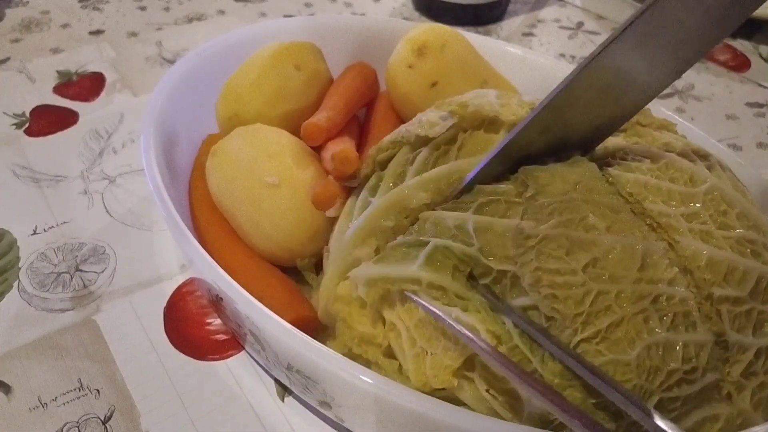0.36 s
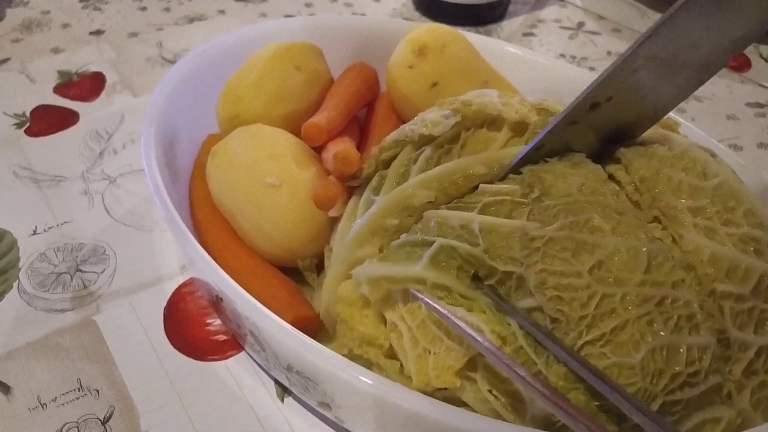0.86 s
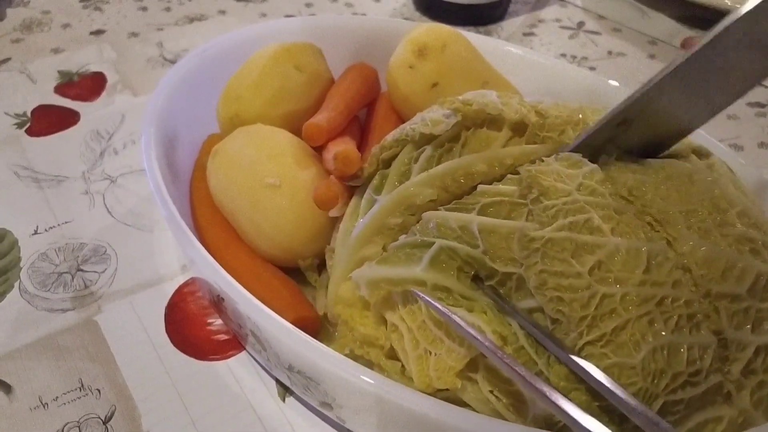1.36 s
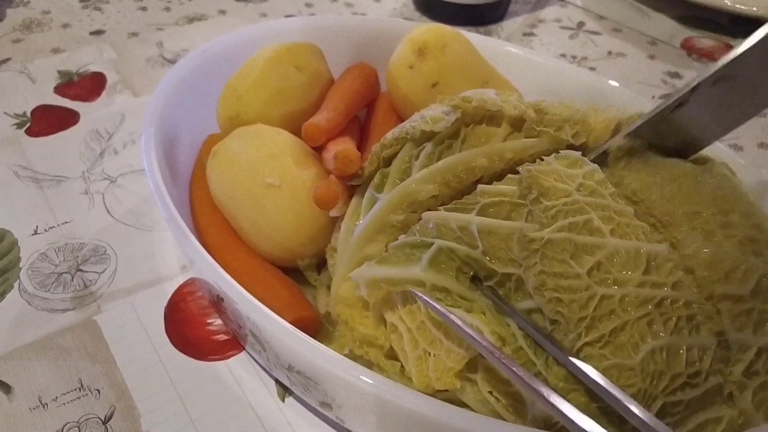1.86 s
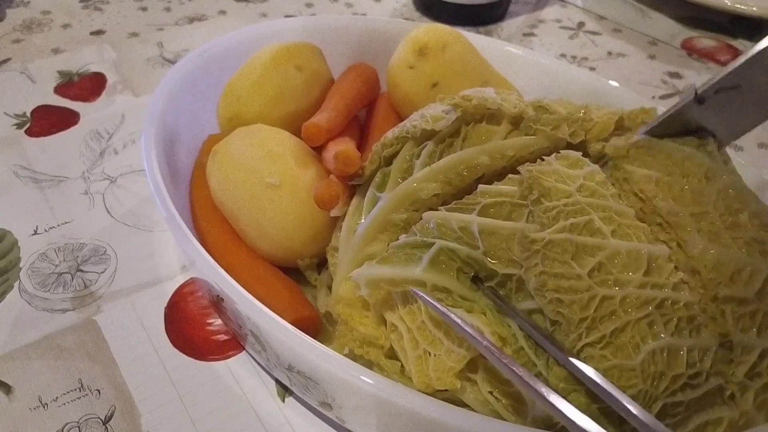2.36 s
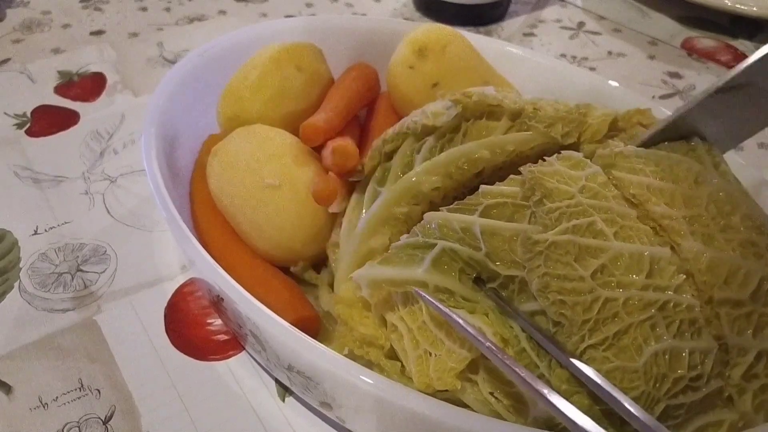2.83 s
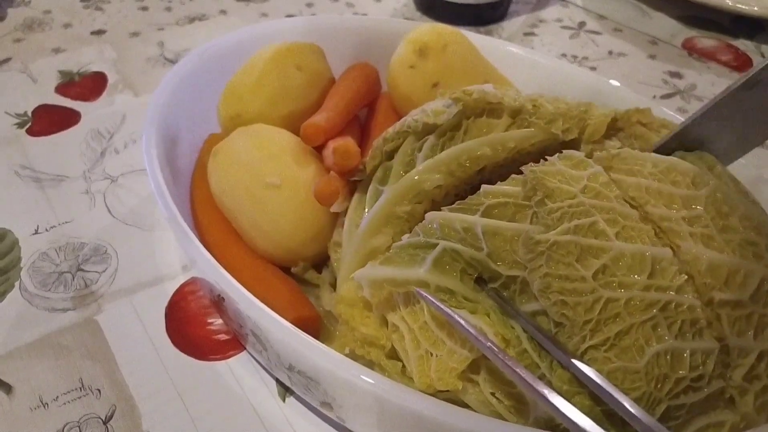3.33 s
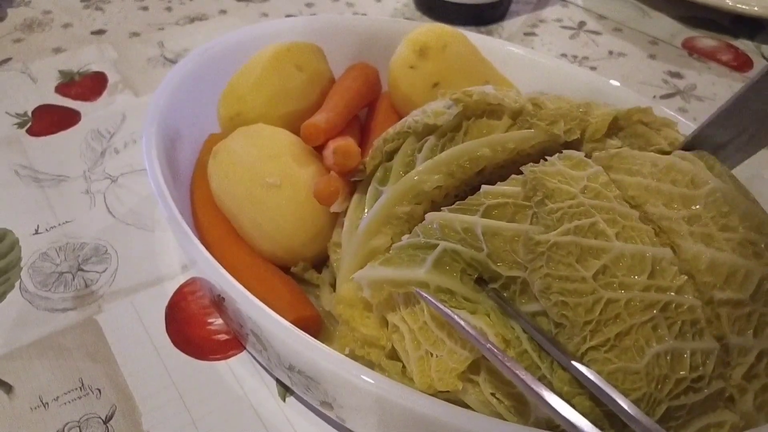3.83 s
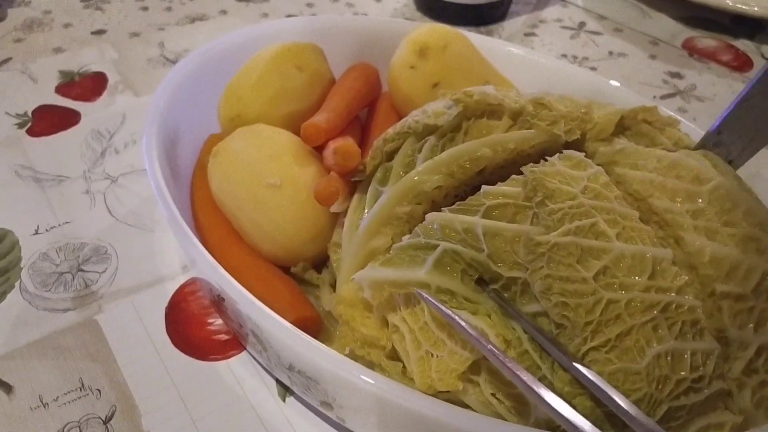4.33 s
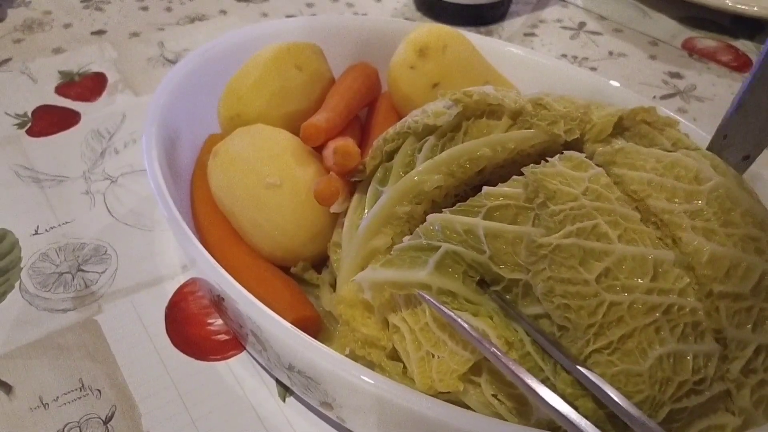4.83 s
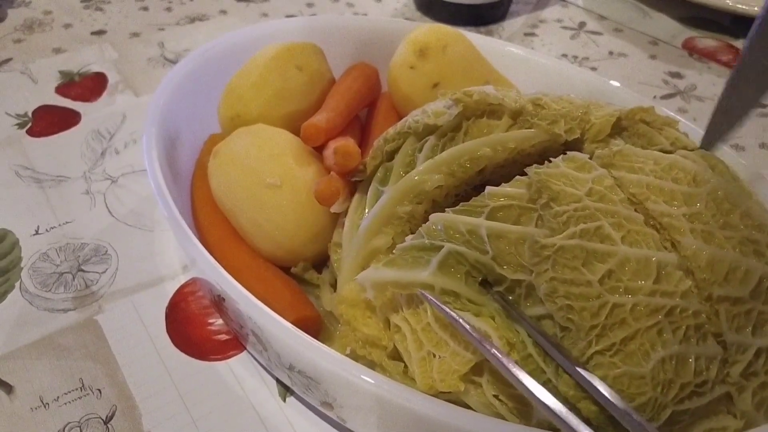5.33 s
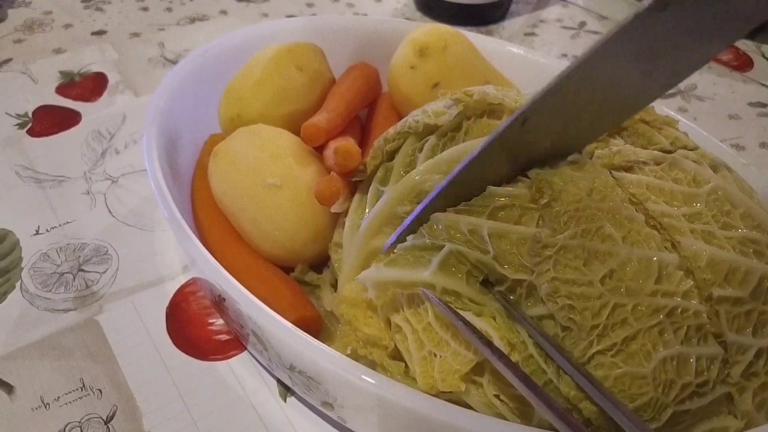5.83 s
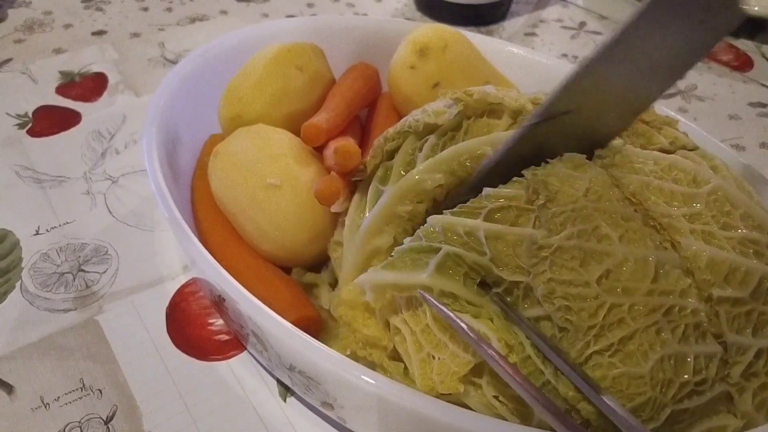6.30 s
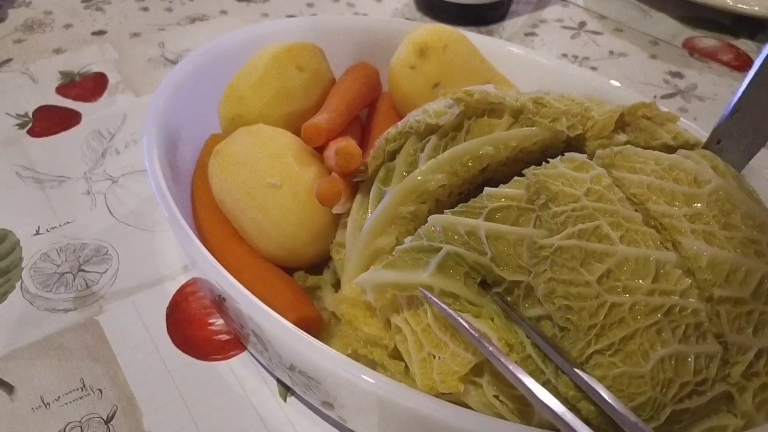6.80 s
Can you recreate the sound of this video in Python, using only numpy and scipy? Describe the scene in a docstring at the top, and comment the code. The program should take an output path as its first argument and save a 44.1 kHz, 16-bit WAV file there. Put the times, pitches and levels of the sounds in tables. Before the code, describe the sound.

In a small hard kitchen, a steel knife works through soft cooked cabbage in a ceramic dish. Quiet wet squelches and hisses alternate with thuds on the dish floor, which grow into loud hard knocks. Bright clinks on the rim follow, then a near-quiet pause, a quick triple tap, and a short gritty scrape with a slight squeal ending in a sharp clink. Close phone microphone, short live echo.

```python
"""In a small hard kitchen, a steel knife saws through cooked cabbage in a ceramic dish, close to a phone.
Coloured noise that swells with each stroke makes the wet leaves squelch and hiss; short sines make them snap.
The blade chops the dish floor and clinks on the rim: dying sines ring dish, blade and table, noise cracks.
Dragged along the glaze, it shakes the same sines with rough noise and squeals.
Fading noise makes the room's answer, over a low hum of filtered noise."""
import sys
import numpy as np
from scipy import signal
from scipy.fft import rfft, irfft, next_fast_len
from scipy.io import wavfile
from scipy.ndimage import map_coordinates

SR = 44100
rng = np.random.default_rng(int(sys.argv[2]) if len(sys.argv) > 2 else 0)


def digitize_waveform(pressure):
    """Quantize a signal to 16-bit integers and store it at the path in sys.argv[1].

    Rows of a 2-D input are taken as channels; values are limited to [-1, 1].
    """
    field = np.atleast_2d(pressure).T
    bounded = np.clip(field, -1, 1)
    quanta = np.round(bounded * 32767).astype(np.int16)
    wavfile.write(sys.argv[1], SR, quanta)


def how_loud(loudness_db):
    """Turn decibels into a plain amplitude multiplier (0 dB gives 1, 20 dB gives 10)."""
    steps = np.asarray(loudness_db, float) / 20
    return 10 ** steps


N = 305565  # length of the scene in samples
TAIL = SR // 2  # length of every ring and room tail in samples

# Steady kitchen air. Each row: frequency in Hz, level in dB.
HUM_COLOUR = [(12, -30), (20, 5), (32, -9), (105, -20.5), (151, -12.5), (217, -16.5), (249, -8),
              (270, -15.5), (818, -30.5), (914, -29.5), (1550, -40), (4310, -42.5), (9630, -39),
              (15000, -43.5)]
# How alike the hum is on left and right. Each row: frequency in Hz, likeness from 0 to 1.
HUM_LIKENESS = [(60, 0), (180, 0.68), (550, 0), (1650, 0.31), (4970, -0.0), (15000, 0.089)]
HUM_DB = -64

# Blade strokes through the leaves. Each row: start in seconds, length in seconds, squelch level in dB,
# hiss level in dB, swell of the squelch over the stroke in dB.
STROKES = [(0.01, 0.039, -84, -74, 3), (0.173, 0.14, -79.5, -79, 7), (0.405, 0.046, -85, -72.5, 5),
           (0.616, 0.097, -68, -70.5, 3), (0.977, .07, -76, -76, -2), (1.032, 0.095, -70.5, -64, 6.5),
           (1.44, 0.13, -71.5, -65.5, 11.5), (1.543, 0.026, -58.5, -75, 0.5), (1.723, 0.18, -80, -78, -14),
           (1.974, 0.15, -59.5, -67.5, -10.5), (2.267, 0.086, -75.5, -79.5, -2.5),
           (2.499, 0.16, -73.5, -75.5, 8), (2.922, 0.03, -78, -82, -6.5), (3.052, 0.1, -76, -69, 16.5),
           (3.383, .12, -72.5, -71, -17), (3.569, 0.054, -79.5, -72, 19), (3.92, 0.022, -75, -72, -12),
           (4.046, 0.07, -79, -68, 5), (4.3, 0.045, -64.5, -67.5, -5.5)]
# Colour of the squelch. Each row: frequency in Hz, level in dB.
SQUELCH_COLOUR = [(150, -13), (400, -3.5), (800, -4), (1200, -13), (2500, -14), (5000, -37.5),
                  (9000, -59.5)]
# Colour of the hiss. Each row: frequency in Hz, level in dB.
HISS_COLOUR = [(1500, -16), (3000, -6.5), (6000, -9.5), (9500, 1), (11000, -3), (12500, -25),
               (16000, -27.5)]
# Wet leaf snaps. Each row: start in seconds, level in dB, pitch in Hz.
SNAPS = [(1.4561, -54.5, 9500), (1.9914, -59, 10300), (3.057, -61, 10440), (3.099, -48.5, 8520),
         (3.1396, -52, 8700), (3.4164, -60, 10300), (3.43, -54, 10300), (3.9402, -54.5, 10550),
         (4.068, -49, 9000), (5.2874, -47.5, 8830)]
BITE_S, LETTING_GO_S = 0.03, 0.22  # rise at the start, time to fall 60 dB after the stroke
HISS_FADES_DB_PER_S = 26  # strongest as the edge bites
RESTING_SQUELCH_DB, RESTING_HISS_DB = -86, -100  # the cut leaves settle throughout

# Blade landing on the dish floor through the leaves. Each row: start in seconds, level in dB,
# spot (0 near end, 1 middle, 2 and above far end), weight in dB, sharpness of the edge in dB.
CHOPS = [(0.696, -26, 0.053, -4, 0.5), (1.123, -15.5, 0.069, -13, -6.5), (1.599, -25.5, 0.068, -11, -4),
         (2.104, -60, 0.37, 6, -10), (2.628, -13.5, 0.47, -17.5, -12), (3.159, -8.5, 0.98, -15, -11.5),
         (3.357, -39, 0.62, -14.5, -9), (3.65, -4.5, 0.97, -20.5, -21.5), (4.143, -9, 1.34, -16.5, -18.5),
         (4.51, -2, 1.42, -15.5, -19), (4.804, -7, 1.96, -4.5, -9.5), (4.818, -14.5, 1.7, -2.5, -4.5),
         (5.015, -9.5, 3.7, -2.5, -14), (6.227, -18.5, 0.64, -6, -2), (6.24, -25, 0.49, 0.5, 2.5),
         (6.254, -31, 0.37, 1, 2.5), (6.645, -58, 0.11, 7, -22)]
# Bare blade touching the rim. Each row: start in seconds, level in dB, weight in dB, edge in dB.
CLINKS = [(4.113, -10.5, -15.5, -11), (4.777, -4.5, -14, -4), (4.883, -11, -19.5, -9),
          (4.891, -16.5, -15.5, -11), (5.27, -27.5, -19.5, -19), (5.303, -26.5, -25.5, -14.5),
          (5.313, -35.5, -9.5, -3.5), (6.898, -3.5, -16.5, -6.5), (6.904, -7.5, -20, -10)]
# Where table, low dish, middle of the dish, high dish and steel sound. One frequency in Hz for each.
PARTS_HZ = [200, 650, 1350, 2500, 6000]
# Ringing modes of table, dish and blade. Each row: pitch in Hz, base decay time in seconds (at least
# halved when it rings), strength in dB for a chop at the near end, in the middle, at the far end,
# for a clink, for the drag.
MODES = [(87, 0.15, 11, -1, 2, 0, -19), (128, 0.11, 4, 2.5, 6, 0, -15), (171, 0.23, 11, 3, 0.5, 4.5, -15),
         (195.8, 0.29, 5.5, -0.5, -1.5, -1.5, -35), (254, .15, 13.5, 11.5, 10.5, 7.5, -30),
         (285, 0.16, 1, 4, 0.5, -1, -11), (341, 0.17, 10, 2, -0.5, -4, -15),
         (513.2, 0.24, 6.5, -11, 0, 4, -31), (546.7, 0.11, 16, -8, 11, 3.5, -2),
         (587.7, 0.21, 1.5, 9.5, -1, -4.5, 0.5), (647, 0.22, -11, -9, 7, 9.5, -8),
         (741, 0.13, 1.5, 0.5, 11.5, -1, -25), (798, 0.098, 8.5, 5, 5.5, 3, -50),
         (840.5, 0.083, 9.5, 1, 9.5, 10.5, -42), (976, .14, 2, 8.5, -4, -14.5, -5),
         (1288, 0.092, -7.5, -13.5, -8.5, -6, 9), (1340, 0.05, -25, -3, -11, 11, -8),
         (1339.2, 0.32, 7.5, -9, 3.5, 0.5, 1), (1457, 0.11, -16, 11, -10, -6, -21),
         (1608, 0.17, -8.5, 3, -6.5, -10.5, -20), (1642, 0.28, -3, -5.5, -5.5, -2.5, -1),
         (1747, 0.17, -16.5, 9.5, -7.5, -11.5, -21), (2070, 0.11, 3.5, -1.5, -4, -11.5, -11),
         (2112, 0.24, -1.5, 10, 2.5, -0.5, -0.5), (2149, 0.096, 3, 2.5, -5.5, 13, -15),
         (2484, 0.062, 4, 5.5, -1.5, 2.5, -30), (2807, 0.25, -15, -9, 7, -6, -34),
         (2923, 0.27, 0, -4.5, 2, 5.5, -24), (3856, 0.19, 7.5, 6.5, -0.5, 3.5, -6),
         (3753, 0.075, 8.5, 5, 6.5, -7, -27), (4193, 0.18, 3, 8.5, 3, -5.5, -23),
         (4904, 0.22, -6.5, -4.5, -4, 8.5, -22), (5270, 0.066, 10.5, 14.5, 4.5, -1.5, -33),
         (6060, .35, -18.5, 3.5, -1, 8, -44), (7310, 0.26, -3.5, -5, -6.5, 12.5, -46),
         (8720, 0.083, 12.5, 15, 8, 16, -39), (9610, 0.088, 7.5, 5, 0, -2.5, -44),
         (10230, 0.23, 0, 5, 3.5, 7, -42), (9910, 0.06, 7, 12.5, 6, 1.5, -15),
         (12550, .25, -18.5, -5.5, -11, -5, -44), (13240, .2, -18.5, -10.5, -13, -8.5, -57)]
# Unpitched burst of a contact. Each row: frequency in Hz, level in dB.
CRACK_COLOUR = [(60, -11.5), (150, 3.5), (600, -5.5), (1500, -4), (2500, -14.5), (4000, -12), (6000, -8.5),
                (7500, -14), (9000, -11), (11000, -9), (12500, -30), (16000, -32.5)]
# Weight sounds in the table and the low dish, a sharp edge in the high dish and the steel.
CHOP_TABLE_DB, TABLE_DB_PER_SPOT, CHOP_STEEL_DB = 2.5, -1, -11
CLINK_TABLE_DB, CLINK_STEEL_DB = -7, -18.5

# Blade dragged on the glaze. Each row: time in seconds, pressure in dB, grit in dB.
DRAG = [(6.36, -32, -31), (6.4, -30, -21), (6.45, -35, -15.5), (6.5, -42, -13.5), (6.54, -33.5, -23),
        (6.62, -36.5, -25.5), (6.67, -37, -29), (6.715, -42.5, -27), (6.8, -39.5, -25.5),
        (6.87, -32.5, -30.5)]
# Colour of the grit. Each row: frequency in Hz, level in dB.
GRIT_COLOUR = [(300, -20), (700, 12), (1500, -7), (2500, 16), (3500, -1), (6000, -1.5), (9000, -5.5),
               (10800, 0), (12000, -47), (15000, -45.5)]
# The squeal swells and slides up where the stroke is fastest.
FASTEST_S, FAST_FOR_S = 6.61, 0.062  # centre and spread of a bell-shaped speed curve
SQUEAL_DB, SQUEAL_REST_DB, SQUEAL_HZ, SQUEAL_RISE_HZ = 5, -3, 1400, 227

# Room echo. Each row: frequency in Hz, time to fall 60 dB in seconds.
KITCHEN = [(80, 0.22), (250, 0.56), (600, 0.5), (1500, 0.4), (4000, 0.41), (10000, 0.35)]
# The right microphone port faces away. Each row: frequency in Hz, direct sound in dB under left,
# direct phase lag in radians, room in dB under left, likeness of the room to left from 0 to 1.
RIGHT_PORT = [(60, 5.5, -1.5, 2.5, 0.88), (124, 0.5, -0.74, 4.5, 0.6), (264, 7.5, -1.63, 5, 0.82),
              (559.6, 0, 0.5, 2, 0.43), (812, 4.5, 0.63, 7.5, 1), (1333, 1.5, 1.5, 2, 0.17),
              (1955, 5, 5, 5, 0.6), (2293, 13.5, 5, 11, 0.2), (3000, 9.5, 4.5, 9.5, 0.085),
              (4002, 11, 5, 13.5, .05), (5044, 2.5, 4.5, 9, 0.055), (6000, 8.5, 5, 10.5, 0.059),
              (7060, 14, 4, 16.5, .05), (8700, 21, -8, 19.5, .05), (10300, 30.5, 11, 23, 0.037),
              (14450, 16, 4.5, 9, .05)]


def unit(x):
    """Scales a sound to an rms of 1."""
    return x / np.sqrt(np.mean(x ** 2) + 1e-20)


def along(points, hz, column=1):
    """Reads one column of a table between its rows, on a log frequency axis."""
    table = np.transpose(points)
    return np.interp(np.log(hz + 1), np.log(table[0] + 1), table[column])


def curves(rows):
    """Draws straight lines between rows: one value per sample for each column after the time."""
    s, *cols = np.transpose(rows)
    return [np.interp(np.arange(N) / SR, s, c) for c in cols]


def wobble(rate):
    """Makes a smooth random curve with `rate` random points a second."""
    knots = rng.standard_normal(int(N * rate / SR) + 4)
    return map_coordinates(knots, [np.arange(N) * rate / SR])


def filtered(x, response):
    """Multiplies the spectrum of x by a response, which may also turn the phase."""
    m = next_fast_len(x.shape[-1] + 8192)
    spectrum = rfft(x, m) * response(np.fft.rfftfreq(m, 1 / SR))
    return irfft(spectrum, m)[..., :x.shape[-1]]


def noise(colour, size=N):
    """Makes random noise with a given colour and an rms of 1."""
    return unit(filtered(rng.standard_normal(size), lambda hz: how_loud(along(colour, hz))))


def heard(x, wet_db):
    """Stacks the direct sound and two unrelated room tails of it; in each tail every pitch dies at its own rate."""
    hz, t, z = signal.stft(rng.standard_normal((2, TAIL)), SR, nperseg=256)
    fading = z * how_loud(-60 * t / along(KITCHEN, hz)[:, None])
    tails = signal.istft(fading, SR, nperseg=256)[1][:, :TAIL]
    tails = tails * np.clip(np.arange(TAIL) / SR / 0.0021 - 0.4, 0, 1)  # the first walls come late
    tails = tails / np.linalg.norm(tails[0])
    wet = signal.fftconvolve(x[None], tails, axes=1)[:, :len(x)]
    return np.vstack([x, how_loud(wet_db) * wet])


def hum():
    """Steady kitchen air: slowly wavering noise, partly alike on the two ports through a shared and an opposed part."""
    def turn(hz):
        return np.arccos(np.clip(along(HUM_LIKENESS, hz), -1, 1)) / 2

    both = np.array([noise(HUM_COLOUR), noise(HUM_COLOUR)])
    mid, side = filtered(both, lambda hz: np.array([np.cos(turn(hz)), np.sin(turn(hz))]))
    level_db = HUM_DB + 2.9 * wobble(5.2) + [[1.5], [-1.5]]  # left a little louder
    return how_loud(level_db) * np.array([mid + side, mid - side])


def sawing():
    """Gains of squelch and hiss: each stroke bites, its squelch swells or sinks as its hiss fades, and it lets go."""
    t = np.arange(0, N / SR, 1 / 1000)  # one value each millisecond
    gains = how_loud([[RESTING_SQUELCH_DB], [RESTING_HISS_DB]]) * np.ones(len(t))
    for s, length, squelch_db, hiss_db, swell_db in STROKES:
        bite = np.clip((t - s) / BITE_S, 0, 1)
        letting_go = how_loud(-60 * np.maximum(t - s - length, 0) / LETTING_GO_S)
        squelch = how_loud(squelch_db + swell_db * np.clip((t - s) / length, 0, 1))
        hiss = how_loud(hiss_db - HISS_FADES_DB_PER_S * np.maximum(t - s, 0))
        gains = gains + bite * letting_go * [squelch, hiss]
    return curves(np.transpose([t, *gains]))


def leaves():
    """Wet leaves squelch and hiss along the blade, crackle finely and snap now and then."""
    squelch_gain, hiss_gain = sawing()
    crackle = 1 + 3.5 * np.maximum(wobble(700) - 1.3, 0)  # brief bursts as veins tear
    squelch = squelch_gain * how_loud(2.4 * wobble(33) + 3.2 * wobble(160)) * noise(SQUELCH_COLOUR)
    hiss = hiss_gain * how_loud(3.2 * wobble(30) + 1.1 * wobble(110)) * crackle * noise(HISS_COLOUR)
    snaps, t = np.zeros(N + TAIL), np.arange(400) / SR
    for s, db, hz in SNAPS:
        rough_phase = 2 * np.pi * hz * t + 0.37 * rng.standard_normal(len(t))
        snaps[round(s * SR):][:len(t)] += how_loud(db - 60 * t / 0.015) * np.sin(rough_phase)
    return heard(squelch + hiss + snaps[:N], wet_db=-4.5)


def ringing(damping):
    """One dying sine per mode; low modes swell for a cycle or two, leaves and fingers shorten the high ones most."""
    hz, decay_s = np.transpose(MODES)[:2, :, None]
    t = np.arange(TAIL) / SR
    dying = how_loud(-60 * t / decay_s * (2 + damping * hz / 1000))
    swelling = 1 - np.exp(-t * hz / 0.65)
    return dying * swelling * np.sin(2 * np.pi * hz * t)


def contacts(times, levels_db, parts_db, strengths_db, damping, ring_db, crack_db, crack_s, wet_db):
    """Each contact rings the modes at its own balance, each starting up or down at random, and cracks."""
    out, modes, t = np.zeros((3, N + TAIL)), ringing(damping), np.arange(TAIL) / SR
    hz = np.transpose(MODES)[0]
    for s, db, part_db, strength_db in zip(times, levels_db, parts_db, strengths_db):
        table_db, low_db, high_db, steel_db = part_db
        parts = list(zip(PARTS_HZ, [table_db, low_db, -6, high_db, steel_db]))
        level = how_loud(ring_db + strength_db + along(parts, hz) + rng.normal(0, 2.2, len(hz)))
        ring = (level * rng.choice([-1, 1], len(hz))) @ modes
        burst = filtered(noise(CRACK_COLOUR, size=TAIL), lambda f: how_loud(along(parts, f)))
        crack = how_loud(crack_db - 60 * t / crack_s) * (1 - np.exp(-t / 0.0038)) * burst
        out[:, round(s * SR):][:, :TAIL] += how_loud(db) * heard(ring + crack, wet_db)
    return out[:, :N]


def chops():
    """Mode strengths blend from the near to the far end of the dish; the far end passes less to the table."""
    s, db, spot, weight_db, edge_db = np.transpose(CHOPS)
    blend = np.clip(1 - abs(np.clip(spot, 0, 2)[:, None] - np.arange(3)), 0, 1)
    strengths_db = blend @ np.transpose(MODES)[2:5]
    table_db = weight_db + CHOP_TABLE_DB + TABLE_DB_PER_SPOT * spot
    parts_db = np.transpose([table_db, weight_db, edge_db, edge_db + CHOP_STEEL_DB])
    return contacts(s, db, parts_db, strengths_db, damping=0.43, ring_db=-9.5,
                    crack_db=11.0, crack_s=0.033, wet_db=-7.5)


def clinks():
    """The bare blade rings longer on the rim, as no leaves damp its high modes."""
    s, db, weight_db, edge_db = np.transpose(CLINKS)
    strengths_db = [np.transpose(MODES)[5]] * len(CLINKS)
    parts_db = np.transpose([weight_db + CLINK_TABLE_DB, weight_db, edge_db, edge_db + CLINK_STEEL_DB])
    return contacts(s, db, parts_db, strengths_db, damping=0.04, ring_db=-11.5,
                    crack_db=3.5, crack_s=0.082, wet_db=-9.5)


def drag():
    """Grit under the edge shakes dish and blade in uneven stutters; a rough squeal slides with the speed."""
    level_db, grit_db = curves(DRAG)
    t = np.arange(N) / SR
    speed = np.exp(-((t - FASTEST_S) / FAST_FOR_S) ** 2 / 2)
    squeal_db = SQUEAL_REST_DB + (SQUEAL_DB - SQUEAL_REST_DB) * speed
    squeal_hz = SQUEAL_HZ + SQUEAL_RISE_HZ * speed
    touch = np.clip((t - DRAG[0][0]) / 0.069, 0, 1) * (t < CLINKS[-1][0])  # ends at the last clink
    force = touch * how_loud(level_db + 1.34 * wobble(45) + 1.4 * wobble(160))

    hz, strength_db = np.transpose(MODES)[[0, 6]]
    modes = how_loud(strength_db)[:, None] * ringing(damping=0.13)
    modes = modes / np.linalg.norm(modes.sum(axis=0))
    shake = force * unit(how_loud(2.3 * wobble(500)) * rng.standard_normal(N))  # single grains catch the edge
    low = signal.fftconvolve(shake, modes[hz < 1900].sum(axis=0))[:N]
    coarse_shake = shake * how_loud(grit_db + 22.5)  # coarser grit reaches the high modes
    high = signal.fftconvolve(coarse_shake, modes[hz >= 1900].sum(axis=0))[:N]

    squeal = how_loud(squeal_db) * wobble(450) * np.sin(2 * np.pi * np.cumsum(squeal_hz) / SR)
    grit = how_loud(grit_db + 9 + 1.8 * wobble(300)) * noise(GRIT_COLOUR)
    return heard(how_loud(-1.0) * (low + high) + force * (grit + squeal), wet_db=-7.0)


def scene():
    """The right port hears the dish shaded and phase-shifted, the room partly alike; both pass little deep bass."""
    direct, room, other_room = chops() + clinks() + drag() + leaves()

    def shade(hz):
        return how_loud(-along(RIGHT_PORT, hz)) * np.exp(-1j * along(RIGHT_PORT, hz, column=2))

    def room_shares(hz):
        alike = np.clip(along(RIGHT_PORT, hz, column=4), 0, 1)
        return how_loud(-along(RIGHT_PORT, hz, column=3)) * [alike, np.sqrt(1 - alike ** 2)]

    right_room = filtered(np.array([room, other_room]), room_shares).sum(axis=0)
    both = np.array([direct + room, filtered(direct, shade) + right_room])
    less_bass = filtered(both, lambda hz: (1j * hz / (50 + 1j * hz)) ** 3)
    return how_loud(0.5) * less_bass + hum()


def top_cut(x):
    """Nothing passes above the cut-off."""
    return signal.sosfilt(signal.butter(12, 16480, fs=SR, output="sos"), x)


def record(dry):
    """The microphone saturates softly towards 0.9 and fades at the very top."""
    soft = dry / (1 + abs(dry / 0.9) ** 4) ** (1 / 4)
    finished = filtered(soft, lambda hz: 1 / (1 + (hz / 15300) ** 24))
    return top_cut(finished)


dry = scene()
out = record(dry)
digitize_waveform(out)
```